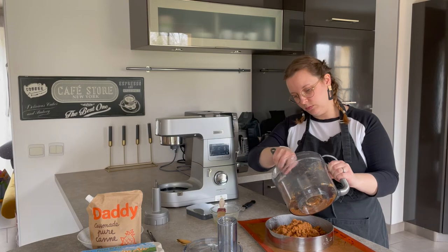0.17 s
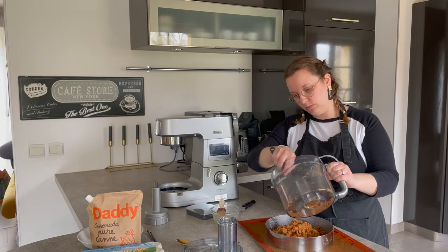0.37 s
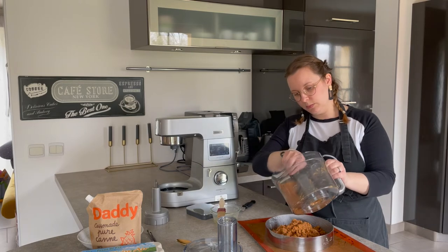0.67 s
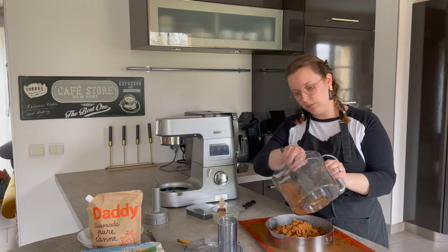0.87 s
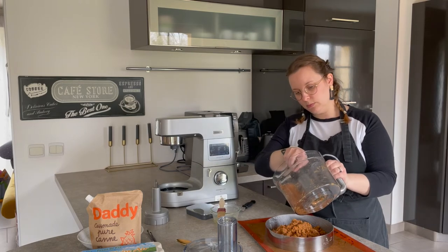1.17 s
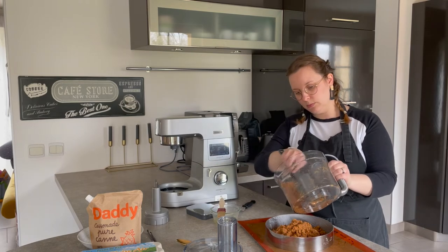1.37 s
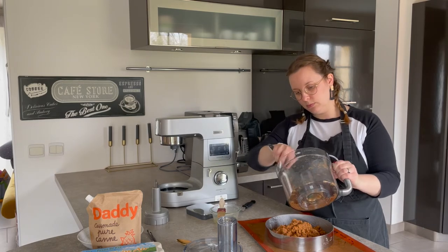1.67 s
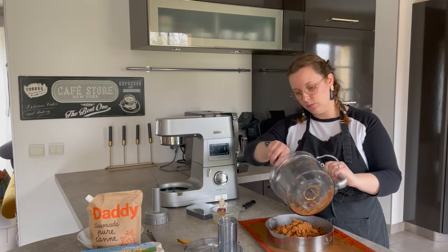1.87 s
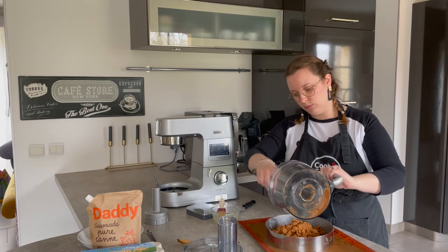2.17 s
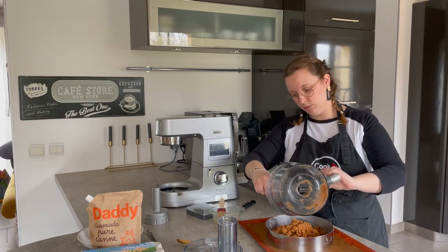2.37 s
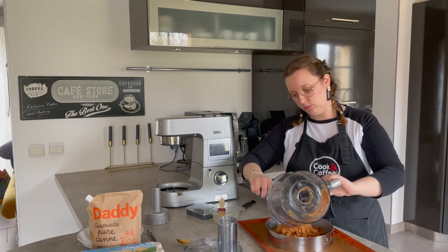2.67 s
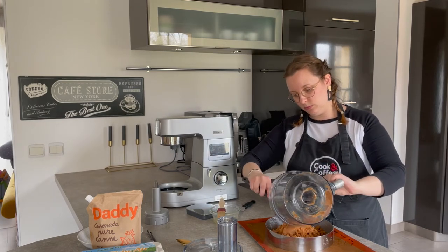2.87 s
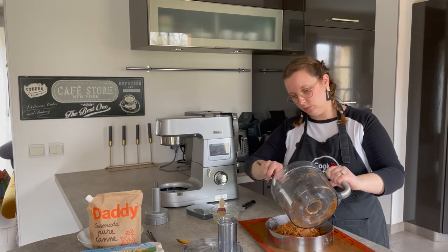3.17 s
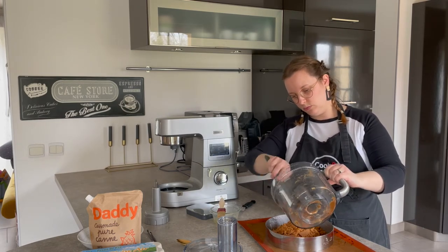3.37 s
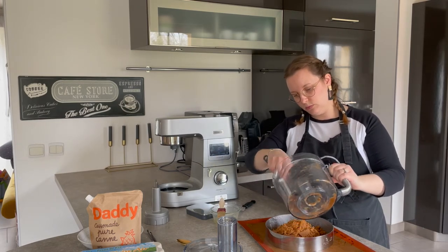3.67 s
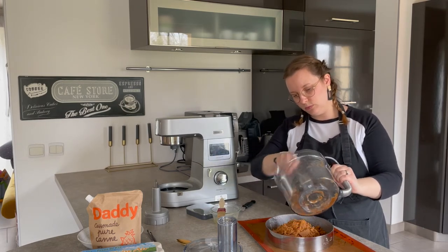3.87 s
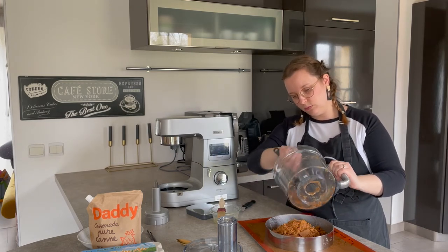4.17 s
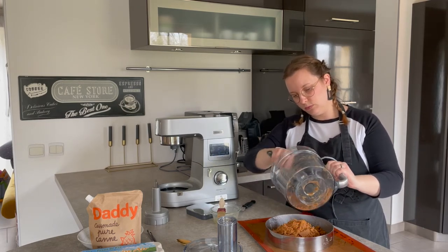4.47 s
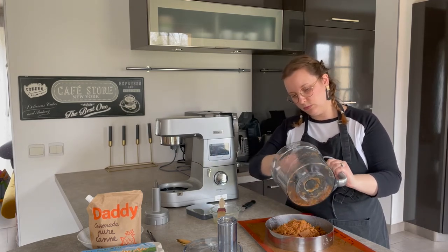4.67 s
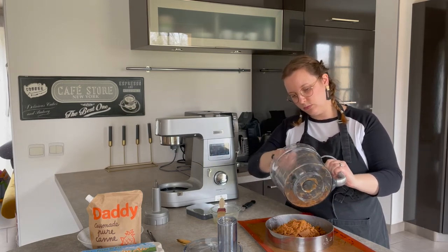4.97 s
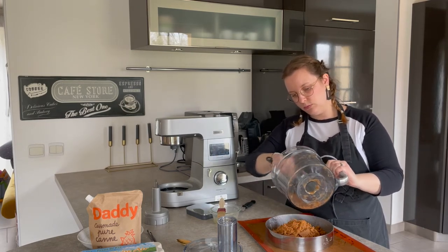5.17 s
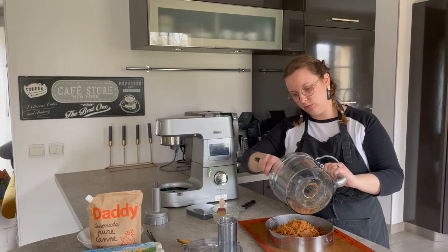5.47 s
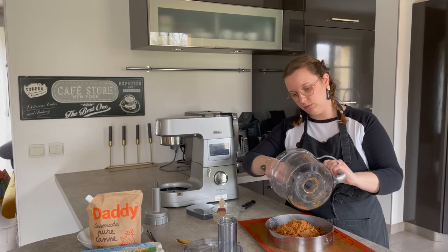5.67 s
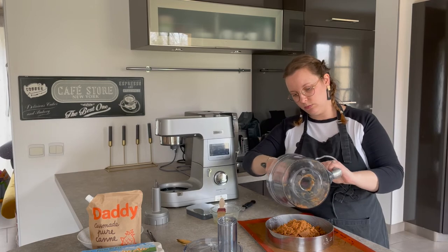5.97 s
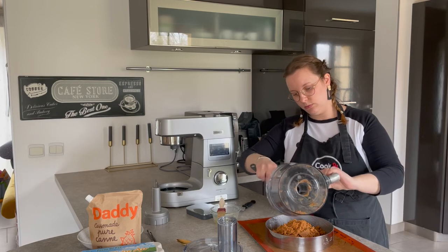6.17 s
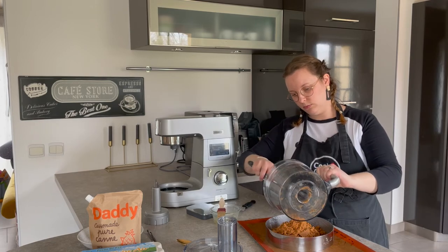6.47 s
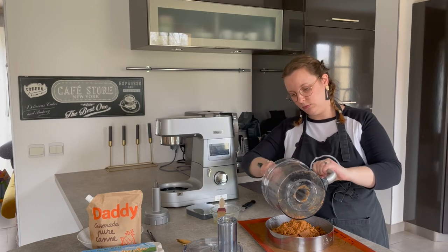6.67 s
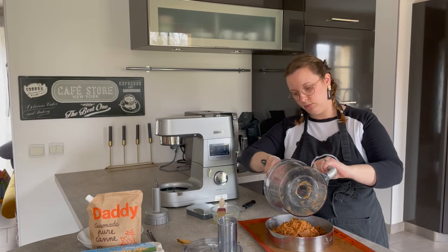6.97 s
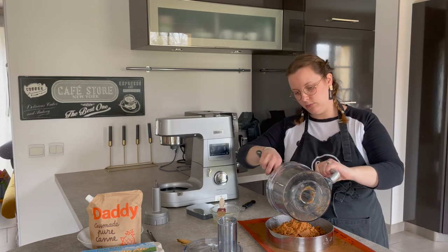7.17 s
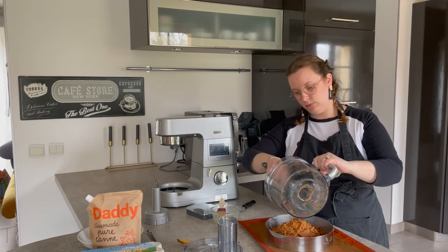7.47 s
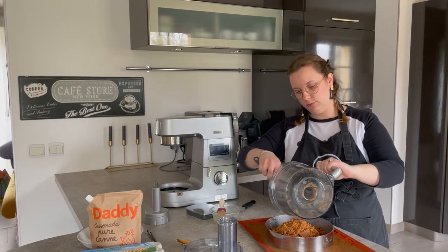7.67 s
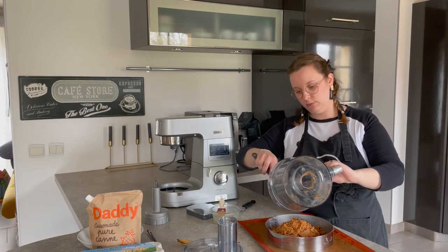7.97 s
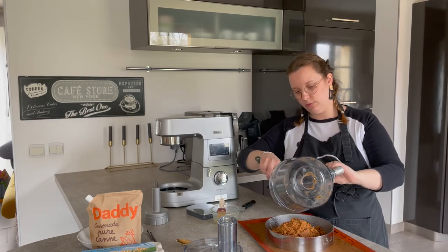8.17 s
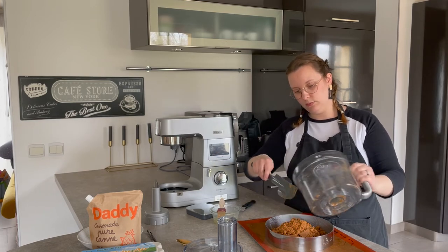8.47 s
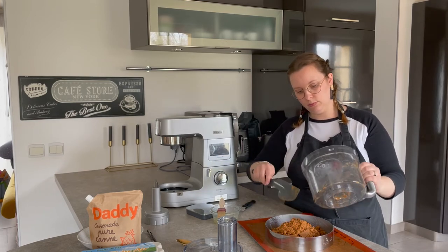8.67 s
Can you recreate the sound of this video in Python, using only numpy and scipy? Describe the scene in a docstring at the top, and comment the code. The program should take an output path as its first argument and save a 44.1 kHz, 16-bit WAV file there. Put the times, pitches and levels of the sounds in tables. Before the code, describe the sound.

Gritty scrapes and dull, hollow plastic knocks as crumbs are emptied from a mixing bowl indoors, over a very faint appliance hum.

```python
"""In a quiet, hard-walled kitchen a spatula scrapes crumbs out of a hard plastic bowl and knocks its wall.
An appliance hums faintly in still air over a wavering rumble: steady tones and shaped noise.
Strokes are gritty noise, heard as edge hiss and as friction driving the bowl's modes.
Knocks ring the same modes as decaying sines, the spot struck deciding which speak, with snap, clack and crumbs.
Two microphone ports hear it all, the bowl also through a decaying noise tail as the room's answer."""
import sys
import numpy as np
from scipy import signal
from scipy.fft import rfft, irfft, next_fast_len
from scipy.io import wavfile
from scipy.ndimage import map_coordinates

SR = 44100
rng = np.random.default_rng(int(sys.argv[2]) if len(sys.argv) > 2 else 0)


def inscribe(sig):
    """Save sig as 16-bit PCM at rate SR to the path in sys.argv[1].

    A 1-D sig is mono; a 2-D sig holds one channel per row.
    Samples are clipped to [-1, 1] before scaling.
    """
    pcm = np.round(np.clip(np.atleast_2d(sig).T, -1, 1) * 32767)
    wavfile.write(sys.argv[1], SR, pcm.astype(np.int16))


N = 388962  # samples


def amp(db):
    """Decibels to gain."""
    return 10 ** (np.asarray(db) / 20)


def unit(x):
    """Scale to rms 1."""
    return x / np.sqrt(np.mean(x ** 2) + 1e-20)


def along(points, hz):
    """Read (Hz, value) points on a log frequency axis."""
    point_hz, values = np.transpose(points)
    return np.interp(np.log(hz + 1), np.log(point_hz + 1), values)


def over_time(points):
    """Draw (s, value) points as one value per sample."""
    seconds, values = np.transpose(points)
    return np.interp(np.arange(N) / SR, seconds, values)


def wobble(rate):
    """A smooth random curve with rate knots a second."""
    knots = rng.standard_normal(int(N * rate / SR) + 4)
    return map_coordinates(knots, [np.arange(N) * rate / SR])


def filtered(x, response):
    """Multiply the spectrum of x by a response, which may be complex."""
    m = next_fast_len(x.shape[-1] + 8192)
    spectrum = rfft(x, m) * response(np.fft.rfftfreq(m, 1 / SR))
    return irfft(spectrum, m)[..., :x.shape[-1]]


def coloured(x, colour):
    """Shape x with a (Hz, dB) curve."""
    return filtered(x, lambda hz: amp(along(colour, hz)))


# How alike a diffuse field is at the two ports.
# Each row: frequency in Hz, likeness from 0 to 1.
PORT_LIKENESS = [(60, 1), (400, 0.63), (1200, 0.09), (5500, 0.44), (6800, 0.97), (8500, 1)]


def spread(pair):
    """Mix two unrelated signals to the likeness of a diffuse field at the ports."""
    def turn(hz):
        return np.arccos(np.clip(along(PORT_LIKENESS, hz), 0, 1)) / 2
    mid, side = filtered(pair, lambda hz: np.array([np.cos(turn(hz)), np.sin(turn(hz))]))
    return np.array([mid + side, mid - side])


# Colour of the rumble. Each row: frequency in Hz, relative density in dB.
RUMBLE_COLOUR = [(15, -54.5), (30, -21), (70, -7.5), (264, -11.5), (310, -7), (420, -13), (500, -18),
                 (650, -27), (1100, -120)]
# Wandering level of the rumble. Each row: time in s, level in dB before its random wobble.
RUMBLE_LEVEL = [(0.0, -57.5), (1.23, -52), (1.9, -55.5), (2.46, -71), (3.2, -72), (3.6, -73), (4.2, -56.5),
                (5.1, -65.5), (5.75, -69.5), (6.09, -59.5), (6.6, -67), (7.2, -73), (7.55, -58),
                (8.1, -65.5), (8.5, -70), (8.82, -72)]
# Colour of the still air. Each row: frequency in Hz, relative density in dB.
AIR_COLOUR = [(15, -54.5), (30, -24), (55, -8.5), (141, -11), (249, -10.5), (354, -16), (470, -22),
              (560, -24), (700, -17), (7510, -29.5), (16000, -40)]
# The appliance's tones. Each row: frequency in Hz, rms level in dB before wobble and slow swell.
HUM_TONES = [(99.8, -75.5), (199.2, -81), (301.5, -76.5), (398.4, -81.5), (452.2, -72.5)]
# Slow swell of air and hum. Each row: time in s, gain in dB.
BACKGROUND_SWELL = [(0, 0.5), (2.0, -2), (3.1, -3), (4.0, 6), (6.2, -2.5), (7.2, -2.5), (7.7, -1),
                    (8.82, -2.5)]


def kitchen():
    """Still air and rumble are shaped noise; the hum is a set of wavering sines."""
    def noise(colour):
        return unit(spread(coloured(rng.standard_normal((2, N)), colour)))

    t = np.arange(N) / SR
    rumble = amp(over_time(RUMBLE_LEVEL) + 1.5 * wobble(3.5)) * noise(RUMBLE_COLOUR)
    air = amp(-68 + 1.0 * wobble(6.2)) * noise(AIR_COLOUR)
    hum = np.zeros(N)
    for hz, db in HUM_TONES:
        level = np.sqrt(2) * amp(db + 1.1 * wobble(1.1))
        hum += level * np.sin(2 * np.pi * hz * t + 0.26 * wobble(9.6))
    return amp(over_time(BACKGROUND_SWELL)) * (air + hum) + rumble


# Decay of the hard-walled room. Each row: frequency in Hz, t60 in s.
ROOM_DECAY = [(200, 0.32), (600, 0.42), (2000, 0.43), (5000, 0.4), (12000, 0.054)]


def room_tail():
    """A fresh two-port room answer, left energy 1: each frequency dies at its own speed."""
    hz, t, noise = signal.stft(rng.standard_normal((2, SR // 2)), SR, nperseg=256)
    decay = amp(-60 * t / along(ROOM_DECAY, hz)[:, None])
    tail = spread(signal.istft(noise * decay, SR, nperseg=256)[1])
    return np.pad(tail, ((0, 0), (200, 0))) / np.linalg.norm(tail[0])  # 200 samples of pre-delay


def in_room(x, wet_db):
    """Add the room to direct sound; the bowl keeps moving, so the answer changes every quarter second."""
    step, tail_len = SR // 4, SR
    wet = np.zeros((2, N + step + tail_len))
    for start in range(0, N, step):
        answer = signal.fftconvolve(x[:1, start:start + step], room_tail(), axes=1)
        wet[:, start:start + answer.shape[1]] += answer
    return x + amp(wet_db) * wet[:, :N]


def grit(grain_db, rate):
    """Noise at both ports whose level jumps as crumbs break and slip."""
    level = amp(grain_db * wobble(rate) + 2.7 * wobble(28))
    return spread(rng.standard_normal((2, N)) * level)


# The strokes of the spatula. Each row: middle in s, length in s,
# then the dry peaks in dB of edge hiss, high rub and low rub.
STROKES = [(0.495, 0.4, -63.5, -90, -79.5), (0.713, 0.27, -63.5, -74.5, -65.5),
           (0.934, 0.11, -56, -69, -67.5), (1.105, 0.29, -87.5, -66.5, -56.5), (1.328, 0.28, -88, -90, -64),
           (1.592, 0.76, -78, -94, -72), (2.096, 0.46, -56.5, -58.5, -68), (2.263, 0.11, -62.5, -64, -71),
           (2.625, 0.81, -64, -65, -66.5), (3.41, 0.18, -59, -53.5, -65), (3.513, 0.23, -58, -59, -68),
           (3.85, 0.16, -84, -80, -72), (4.07, 0.3, -70, -58, -58), (4.203, 0.32, -45.5, -56, -59.5),
           (4.724, 0.13, -52.5, -53.5, -56.5), (5.002, 0.28, -55, -45.5, -60.5),
           (5.263, 0.52, -60, -65.5, -64.5), (5.655, 0.17, -55.5, -59, -80.5),
           (5.896, 0.31, -60.5, -58, -73), (6.202, 0.33, -66, -65.5, -65), (6.464, 0.2, -78, -67.5, -71.5),
           (6.735, 0.2, -58.5, -63.5, -96), (7.054, 0.37, -68, -71, -90.5), (7.458, 0.21, -53, -48, -71),
           (7.61, 0.28, -69, -67, -89), (7.771, 0.16, -90, -86.5, -64.5), (8.156, 0.22, -93, -96, -52.5),
           (8.559, 0.79, -74.5, -79.5, -90.5)]
STROKE_ENDS_DB = 20.5  # how far a stroke's ends lie under its peak
STROKE_PEAK_AT = 0.39  # place of the peak, as a share of the length
HUB_RUB_DB = -7.5  # hub rub against the high rub


def stroke_gains():
    """Hiss, high, low and hub rub swell and fade with the speed of the hand."""
    t, gain = np.arange(N) / SR, np.zeros((4, N))
    for middle, length, hiss_db, high_db, low_db in STROKES:
        late = t - middle + (0.5 - STROKE_PEAK_AT) * length
        reach = length * np.where(late < 0, STROKE_PEAK_AT, 1 - STROKE_PEAK_AT)
        swell = amp(-STROKE_ENDS_DB * (late / reach) ** 2)
        gain += amp([hiss_db, high_db, low_db, high_db + HUB_RUB_DB])[:, None] * swell
    return gain


DRAG_HIGH_DB, DRAG_LOW_DB, DRAG_HUB_DB = -7.5, -2, -8  # against the knock's base, rim and hub modes
DRAG_T60_S = 0.1
MUFFLED_DRAG_DB = 12  # low drag lost per unit of ringing freedom: less where the spatula stays on the wall


def drag_gains():
    """After each knock the edge drags on: high, low and hub rub start softly and die away."""
    gain = np.zeros((3, N))
    t = np.arange(SR // 2) / SR
    for s, db, _, rim_db, base_db, hub_db, *_, free in KNOCKS:
        drag = (1 - np.exp(-(t / 0.011) ** 2)) * amp(db - 60 * t / DRAG_T60_S)
        low_db = rim_db + DRAG_LOW_DB - MUFFLED_DRAG_DB * free
        levels = amp([base_db + DRAG_HIGH_DB, low_db, hub_db + DRAG_HUB_DB])
        part = gain[:, round(s * SR):][:, :len(t)]
        part += (levels[:, None] * drag)[:, :part.shape[1]]
    return gain


def pressed_body(modes, damped):
    """Response of modes widened by the spatula pressing on the wall."""
    def response(f):
        total = 0
        for k, (centre, db, t60) in enumerate(modes):
            width = 1j * f * damped / t60
            total = total + (-1) ** k * amp(db) * width / (centre * centre - f * f + width)
        return total * f ** 2 / (f ** 2 + 350 ** 2)  # thin out the bass
    return response


# Hiss of the edge on crumbs. Each row: frequency in Hz, relative density in dB.
EDGE_COLOUR = [(150, -68.5), (400, -31), (1000, -1), (2200, -20.5), (4000, -7), (6000, -2), (7200, 0),
               (10500, -1.5), (13000, -13), (15600, -3), (16000, -48)]
# The bowl's modes by family, for strokes and knocks alike: wall, rim, lip, base and hub.
# Each row: frequency in Hz, relative level in dB, t60 in s, all before the spread of a blow or the press of a rub.
WALL = [(465.3, -8, 0.13), (500.8, -12.5, 0.056), (555.5, -0.5, 0.098), (589.6, -2, 0.044),
        (615.3, -3.5, 0.059), (647, -6, 0.033)]
RIM = [(751, -2, 0.061), (922.3, 0, 0.087), (979.5, 2, 0.087), (1019, -1, 0.097), (1133, -2.5, 0.055)]
LIP = [(1182, -9.5, 0.032), (1268.4, -2, 0.094), (1603, -10.5, 0.025), (1660, -7, 0.061)]
BASE = [(1817, -5.5, 0.034), (1937, -3.5, 0.048), (2115, -2, 0.029), (2131, -2.5, 0.059), (2229, 6, 0.013),
        (2304, -4, .06), (2517, -1, 0.024), (2615, -4.5, 0.02)]
HUB = [(2730, -1, 0.029), (2975, -7, 0.06), (3141, 0, 0.018), (3310, -10.5, 0.064), (4096, -11, 0.034)]


def strokes():
    """The edge hisses over the crumbs and its friction drives the bowl's modes."""
    hiss = unit(coloured(grit(grain_db=2.6, rate=330), EDGE_COLOUR))
    rasp = grit(grain_db=3, rate=120)
    high = unit(filtered(rasp, pressed_body(BASE, damped=5.4)))
    hub = unit(filtered(rasp, pressed_body(HUB, damped=5.4)))
    low_body = pressed_body(WALL + RIM + LIP + BASE[:2], damped=13.0)
    low = unit(filtered(grit(grain_db=6, rate=99), low_body))
    gain = stroke_gains()
    gain[1:] += drag_gains()
    return gain[0] * hiss + gain[1] * high + gain[2] * low + gain[3] * hub


def crowded(family):
    """Add two weaker, shorter modes at random pitches around each main one, drawn anew for every blow."""
    main = np.array(family, float)
    minor = np.repeat(main, 2, axis=0) * [1, 1, 0.6] - [0, 6.5, 0]
    scatter = 0.1284 * np.tanh((minor[:, 0] / 700) ** 2)
    minor[:, 0] *= np.exp(scatter * rng.standard_normal(len(minor)))
    return np.vstack([main, minor])


FAVOUR_DB, PULL = 10, 0.4  # boost of a mode at a favoured pitch; share of the way near modes are drawn to it
BEND_PER_S = 1.2  # random pitch drift of the flexing wall, as a share a second, weaker in low modes
FIRST_SWING, FIRST_SWING_S = 0.46, 0.007  # extra size while the spatula still touches, and its decay in s
ROUGHEN_HZ = 30  # random phase drift blurs the highest modes to about this width


def ring(modes, db, favoured_hz):
    """One blow on one family: decaying sines at both ports, with energy shared out by the spot struck."""
    hz, level, t60 = np.transpose(modes)[..., None]
    t = np.arange(round(t60.max() * SR)) / SR
    scatter_db, detune, skew, bend = rng.standard_normal((4, len(hz), 1))

    away = np.log(hz / favoured_hz)
    near = np.exp(-(away / [0.075, 0.09, 0.07]) ** 2)  # 1 for a mode at a favoured pitch
    hz = hz * np.exp(0.0091 * detune - PULL * (near * away).sum(1, keepdims=True))
    gain = amp(level + 3.0 * scatter_db + FAVOUR_DB * near.sum(1, keepdims=True))
    gain *= np.linalg.norm(amp(level)) / np.linalg.norm(gain)  # keep the summed energy

    # a mode needs a moment to build up under the soft spatula
    rise = 1 - np.exp(-(t / (0.002 + (18 / hz) ** 2 + 1.4 / hz)) ** 2)
    size = gain * amp(db - 60 * t / t60) * rise
    size = size * (1 + FIRST_SWING * np.exp(-t / FIRST_SWING_S))

    glide = 1 + BEND_PER_S / 2 * bend * np.tanh((hz / 1100) ** 2) * t
    start_phase = 1.17 * scatter_db * np.tanh(hz / 1500)
    phase = 2 * np.pi * hz * glide * t + start_phase
    blur = np.sqrt(2 * np.pi * ROUGHEN_HZ / SR) * np.tanh((hz / 1700) ** 3)
    phase += blur * np.cumsum(rng.standard_normal(phase.shape), axis=1)
    # higher modes beam unevenly, so the ports hear them out of step
    skew = skew * 0.6 * np.tanh((hz / 1000) ** 2)
    return np.array([(size * np.sin(phase + skew)).sum(0), (size * np.sin(phase - skew)).sum(0)])


# The snap of contact. Each row: frequency in Hz, gain in dB.
SNAP_COLOUR = [(200, -24), (1500, -2), (4000, -7.5), (7000, 7.5), (10000, 3), (14000, -4), (16500, -2)]
# Crumbs shaken loose. Each row: frequency in Hz, gain in dB.
CRUMB_COLOUR = [(300, -27), (1500, -14.5), (4500, -4.5), (6000, -0.5), (7300, 3.5), (10500, -1),
                (14500, -7.5), (16500, -12.5)]
# Clack of the many weak modes between the families. Each row: frequency in Hz, gain in dB.
CLACK_COLOUR = [(300, -31), (600, -3.5), (1500, -1), (2300, -16), (3800, -14), (8000, -35.5)]
SNAP_DB, CLACK_DB = 2.5, 3  # against the hub modes and the rim modes
SNAP_T60_S, CRUMB_T60_S, CLACK_T60_S = 0.0041, 0.15, 0.035


def contact_envelopes(snap_db, crumbs_db, clack_db):
    """The snap starts at once; the crumb spray and the dull clack follow with short rises."""
    t = np.arange(SR // 5) / SR
    snap = amp(snap_db - 60 * t / SNAP_T60_S)
    crumbs = amp(crumbs_db - 60 * t / CRUMB_T60_S) * (1 - np.exp(-t / 0.0015))
    clack = amp(clack_db - 60 * t / CLACK_T60_S) * (1 - np.exp(-t / 0.0017))
    return np.array([snap, crumbs, clack])


# The bowl's deep mode. Each row: frequency in Hz, relative level in dB, t60 in s.
DEEP = [(323.7, 5, 0.2)]
# The blows of the spatula. Each row: time in s (the snap leads it slightly), wall mode strength in dB,
# then in dB against the wall: deep mode, rim and lip modes, base modes, hub modes, shaken crumbs;
# then the pitches in Hz that the struck spot favours among wall, rim and lip, base and hub modes;
# last how freely the bowl rings, as a share of each t60 (held to 0.2-1.5 for the ringing; deep mode exempt).
KNOCKS = [(0.074,-50,-8,-10.5,-2,-3.5,6.5,463,1290,2020,0.86),
          (0.172,-30,-10,-13.5,-15.5,-14,-14,525,883,2750,1.5),
          (0.373,-38.5,-9.5,-12,-14,-26,3,498,1140,2230,0.98),
          (0.684,-45.5,-18.5,-12.5,-13,-9.5,-10.5,514,1070,2060,1.1),
          (0.697,-32,-28.5,-19.5,-22.5,-13,-11.5,498,1046,2020,0.89),
          (0.88,-53,0.5,-5.5,3,-1,-0.5,450,1310,2110,0.69),
          (0.983,-7,-25,-17,-21.5,-28.5,-41,526,1298,2010,0.85),
          (1.168,-38,-31,-5.5,-1.5,-4,-12,500,1290,2040,0.62),
          (1.258,-38,-11.5,0.5,-14,-8.5,-21.5,504,910,1960,0.75),
          (1.262,-36,-20,3.5,-27,-14.5,-27,477,1255,1760,0.53),
          (1.405,-46.5,-15,-9,-10,-30,-3,520,1090,2020,1),
          (1.473,-36.5,-15,-19,-45,-41,-29,517,825,2160,0.87),
          (1.493,-37.5,-18,-14.5,-37,-38,-44,523,1200,2150,1.44),
          (1.537,-44,-9,-15,-43,-42.5,-41,461,1160,1960,1.3),
          (1.776,-31,-16.5,-11.5,-7,-15,-30,570,944,2200,0.43),
          (1.913,-38.5,-6,-4,3.5,-1.5,-3.5,478,1030,2105,0.74), (1.94,-46,0,5,-1,3,-5,530,1140,2410,0.91),
          (2.488,-42.5,-16,-16,-28,-24,-6.5,600,900,2790,0.68),
          (2.53,-64,-8.5,-10,18.5,11,0,550,918,2230,0.74),
          (2.755,-46.5,-18,-14.5,6.5,-6,-30,598,930,2180,0.66),
          (2.914,-73,-9,7.5,16,3,-12,453,1100,1990,0.78),
          (3.311,-61.5,-10,6,19,16.5,7.5,555,1150,2137,0.68),
          (3.317,-47,-9.5,3,12,11.5,2.5,540,1150,1910,0.67), (3.435,-60,-10,8,2,11.5,2,615,1160,2070,1.2),
          (3.443,-51.5,-8,0,8.5,10,1.5,633,1150,2470,0.8), (3.719,-52,-26,3.5,9.5,8,-2,440,817,2390,1),
          (3.814,-44.5,-19,-2,4,2,-8,650,1000,2640,1.1),
          (3.907,-35.5,-13,-8.5,-12.5,-23,-28,530,993,2230,1.3),
          (3.923,-35,4.5,-10,-7,-3,-18,588,895,2926,0.83), (3.95,-44,7,12.5,7.5,9,-2.5,573,895,1970,0.61),
          (3.974,-30.5,-25,-1,4,7.5,-3.5,545,937,2220,0.68),
          (4.392,-26.5,-15.5,-3.5,-0.5,3.5,-6,563,895,2260,1.02),
          (4.484,-33,-10,-23,-9.5,-15,-22.5,542,830,2200,0.99),
          (4.566,-53.5,6.5,5,6.5,5.5,-2.5,470,970,2260,1.02),
          (4.882,-24.5,-12.5,-12.5,-2,0,-8,569,940,2975,1.32),
          (5.001,-45.5,-1,4,-6.5,7.5,-5.5,553,1063,2500,1.13),
          (5.428,-56,-11,5.5,11,2,6,666,1260,2170,1.17), (5.488,-65.5,0,16,5.5,14.5,4,446,1160,2110,0.86),
          (5.824,-20,-11,-14.5,-7,-4.5,-19.5,592,926,2990,0.87),
          (6.044,-27.5,-16.5,-12.5,-1.5,-8,-22.5,585,855,2630,0.56),
          (6.256,-42.5,-12,-7,0.5,-22,-30,553,910,1930,1.03),
          (6.272,-45,-28,2.5,0.5,-15,-44,622,794,2040,1.31),
          (6.313,-71,-12,11,2,-13,-26.5,556,917,2040,0.64), (6.659,-76,2,18,12,19.5,20,456,1090,2760,1.8),
          (6.666,-69,6,24,1,25,7,447,1120,2750,1.2), (6.703,-67,10,-7,20,16.5,7,445,1100,2456,0.75),
          (7.355,-18.5,-3.5,-11,-8.5,-9,-16.5,516,938,2220,0.99),
          (7.443,-44,-23,6.5,-6,2,-2,610,1053,2150,1.36), (7.658,-60,-14,-9,13,3,2.5,450,1020,2280,1.2),
          (7.706,-48.5,-3.5,0,10,-9.5,-14.5,530,880,2270,0.74),
          (7.72,-44.5,-22,5,10,-14,-19,547,852,2180,0.63),
          (8.074,-18,-25.5,-7,-8,-31.5,-32,615,900,2034,0.5)]


def knocks():
    """Each blow rings the mode families anew and adds a snap, a dull clack and a spray of crumbs."""
    bowl, contact = np.zeros((2, N + SR)), np.zeros((3, N + SR))
    for s, db, deep_db, rim_db, base_db, hub_db, crumbs_db, wall_hz, rim_hz, high_hz, free in KNOCKS:
        at = round((s - 0.0022) * SR)  # the snap starts here, the wall speaks a moment later
        families = [(WALL, 0), (RIM + LIP, rim_db), (BASE, base_db), (HUB, hub_db)]
        struck = [(np.array(DEEP, float), deep_db)]
        for family, family_db in families:
            struck.append((crowded(family) * [1, 1, np.clip(free, 0.2, 1.5)], family_db))
        for modes, family_db in struck:
            sound = ring(modes, db + family_db, [wall_hz, rim_hz, high_hz])
            bowl[:, at:at + sound.shape[1]] += sound
        burst = contact_envelopes(db + hub_db + SNAP_DB, db + crumbs_db, db + rim_db + CLACK_DB)
        contact[:, at:at + burst.shape[1]] += burst

    snap, crumbs, clack = contact[:, :N]
    snaps = coloured(snap * rng.standard_normal(N), SNAP_COLOUR)  # alike at both ports
    sprays = coloured(crumbs * grit(grain_db=3.5, rate=260), CRUMB_COLOUR)
    clacks = coloured(clack * grit(grain_db=2.5, rate=200), CLACK_COLOUR)
    return bowl[:, :N] + snaps + sprays + clacks


# Shade between the ports. Each row: frequency in Hz, left minus right level in dB.
PORT_SHADE = [(60, 0), (900, -2), (2500, 1), (5200, 1.5), (6200, -5.5), (7200, -3), (8500, -0.5)]
# Phase between the ports, in the treble a plain delay. Each row: frequency in Hz, left lead in radians.
PORT_LEAD = [(0, 0), (600, -.6), (1200, 0), (1700, 1.5), (3100, 0), (4800, 1), (5500, 3.1), (6400, .9),
             (7300, 1.3), (8500, 3.14), (10650, 6.28), (12800, 9.42), (14900, 12.57), (17000, 15.7)]


def scene():
    """Kitchen and bowl as the two ports hear them, each with its own delay and shade."""
    sound = kitchen() + in_room(strokes(), wet_db=-7.5) + in_room(knocks(), wet_db=-3.5)
    half = np.array([[0.5], [-0.5]])  # left and right take half the difference each

    def ports(hz):
        return amp(half * along(PORT_SHADE, hz)) * np.exp(1j * half * along(PORT_LEAD, hz))
    return filtered(sound, ports)


TOP_HZ = 16800


def record(dry):
    """Nothing passes above the band limit."""
    return filtered(dry, lambda hz: hz < TOP_HZ)


dry = scene()
out = record(dry)
inscribe(out)
```